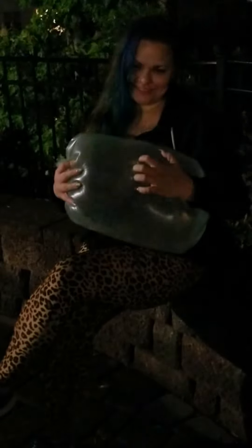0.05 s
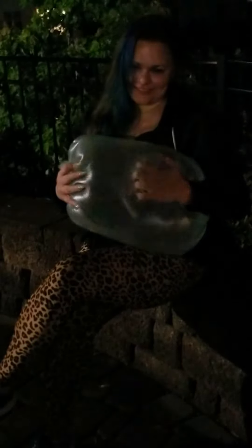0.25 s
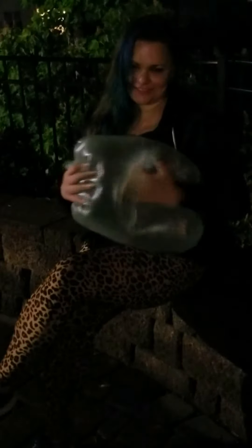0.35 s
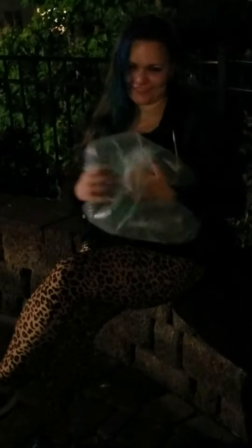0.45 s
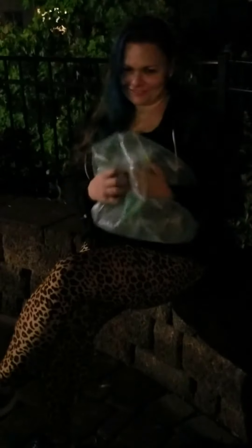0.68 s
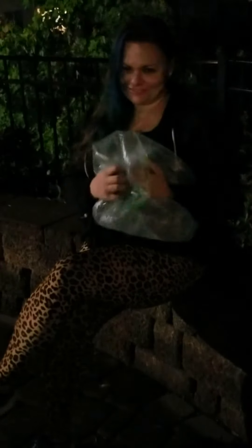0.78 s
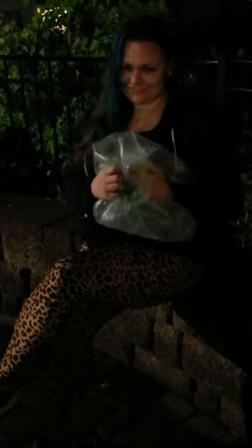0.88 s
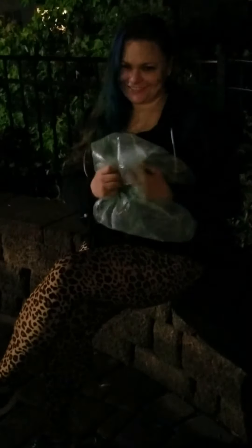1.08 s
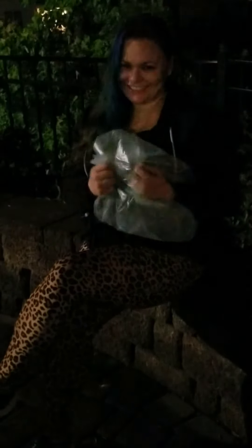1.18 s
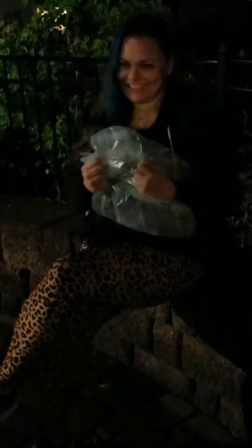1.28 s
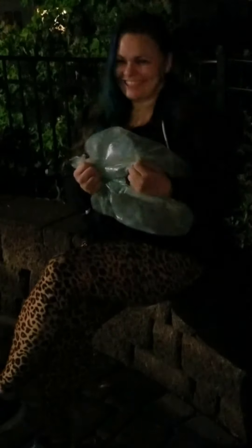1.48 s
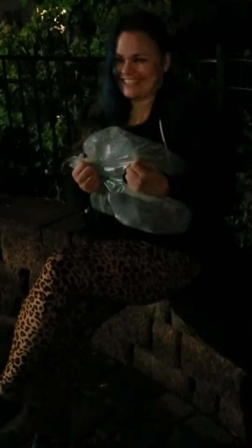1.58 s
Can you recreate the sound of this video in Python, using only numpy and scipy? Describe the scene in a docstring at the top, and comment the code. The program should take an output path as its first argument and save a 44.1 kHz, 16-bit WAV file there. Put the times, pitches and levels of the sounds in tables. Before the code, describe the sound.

An air-filled plastic bag bursts in three sharp, overloading pops, with escaping air and soft film rustle.

```python
"""Soft rubbing over a low night rumble, then three sharp pops that overload the input, the first followed by
two weaker thumps: an air-filled plastic bag is squeezed close to the microphone and bursts. Each burst is a
pressure pulse, ringing air and film modes, a noise crack and a short noise tail. Escaping air hisses (shaped
noise) and whistles (gliding tones). Film rustles (noise) and bumps (short sines) throughout, before and
after the pops; faint wavering far-off tones come and go.
"""
import sys
import numpy as np
from scipy import signal
from scipy.fft import rfft, irfft
from scipy.io import wavfile
from scipy.ndimage import uniform_filter1d

SR = 44100
rng = np.random.default_rng(int(sys.argv[2]) if len(sys.argv) > 2 else 0)


def to_wav(sig):
    """Store sig (one row per channel, or 1-D mono) as 16-bit WAV at the path in sys.argv[1].

    Samples outside -1..1 are clipped; the rate is SR.
    """
    pcm = np.clip(np.atleast_2d(sig), -1, 1) * 32767
    pcm = np.round(pcm).astype(np.int16)
    wavfile.write(sys.argv[1], SR, pcm.T)  # frames by channels


N = 72765
T, HZ = np.arange(N) / SR, np.fft.rfftfreq(N, 1 / SR)

# Spectra below are relative: colour() rescales the result to rms 1.

# Three pops, with two weaker thumps after the first: (time [s], blast [dB], air ring [dB],
#   ring pitch [Hz], film ring [dB], crack [dB], crack decay to 1/e [s], tail [dB], tail length [s])
POPS = [(0.2188, -36.5, -11, 268.5, 6.5, -1.5, 0.0035, -15.5, 0.018),
        (0.227, -20.5, -11.5, 290, -14.5, -21.5, .002, -24, 0.017),
        (0.2395, -12.5, -15, 390, -3.5, -19, 0.00067, -19, 0.013),
        (0.3306, -4, -4, 378, 2.5, -8.5, 0.0037, -17, 0.015),
        (.4234, 3, -9, 378.2, 2, -15, 0.0023, -16, 0.011)]
# Modes of the air in the bag: (multiple of ring pitch [ratio], relative level [dB], T60 [s])
AIR_MODES = [(1, 1.5, 0.029), (.68, -7, 0.02)]
# Modes of the stretched film: (frequency [Hz], relative level [dB], T60 [s])
FILM_MODES = [(686, -24, 0.057), (847.7, -22.5, 0.026), (1285, -12.5, 0.028), (1383, -11.5, 0.02),
              (1896, -10.5, 0.012), (2912, -21.5, .03), (3150, -23.5, 0.012), (4904, -24, .02)]
# Crack spectrum: (frequency [Hz], level [dB])
CRACK_SPECTRUM = [(100, -14), (500, 16), (950, -4), (1300, 5), (1750, -6), (2100, 0), (3200, -2.5),
                  (4300, -18), (6000, -9), (8000, -17.5), (11000, -15), (16000, -31)]
# Spectrum of the fading body of the noise tail: (frequency [Hz], level [dB])
TAIL_BODY_SPECTRUM = [(25, -20), (80, -18.5), (160, 6), (300, 0), (420, -1), (520, -5.5), (750, -4.5),
                      (1000, -10.5), (1350, -7), (2500, -12), (5000, -20.5), (10000, -30.5), (16000, -35)]
# Spectrum of the level treble of the noise tail: (frequency [Hz], level [dB])
TAIL_TREBLE_SPECTRUM = [(60, -29), (1500, -1), (2800, 4), (6000, -17), (11000, -6), (16000, -19.5)]
BLAST_ZERO_S = 0.00054  # the pulse turns from pressure to suction here
TEAR_S, TEAR_DB = 0.0016, -10  # rise before the pop
TAIL_FADE_DB, TAIL_END_S, TAIL_TREBLE_DB = 8, 0.0013, -17.5
CRACK_LIKENESS = 0.73

# Escaping air: (time [s], level [dB])
LEAK_LEVEL = [(.195, -81), (.213, -54), (.222, -27.5), (.26, -38.5), (.32, -42), (.35, -36.5),
              (.365, -37.5), (.41, -36.5), (.445, -37.5), (.484, -38.5), (.5, -51), (.56, -53), (.7, -68)]
# Hiss spectrum before dulling: (frequency [Hz], level [dB])
HISS_SPECTRUM = [(60, 5.5), (320, -5), (520, -10), (700, 0), (1000, -5), (2000, -4), (2600, -3.5),
                 (4000, -5), (7000, -9), (12000, -9.5), (16000, -16.5)]
DULL_FROM_S, DULL_DB_PER_S, DULL_HZ = 0.34, 103, 2540
CRINKLE_DB, CRINKLES_PER_S = -6.5, 1300

# Main whistle of the tear: (time [s], pitch [Hz], level before breath mix [dB])
WHISTLE = [(.222, 1340, -39.5), (.25, 1356, -33.5), (.275, 1346, -32), (.292, 1306, -35.5),
           (.3, 1228, -40.5), (.325, 1284, -38), (.348, 1255, -39)]
# Fuzzy upper whistle: (time [s], pitch [Hz], level before breath mix [dB])
UPPER_WHISTLE = [(.25, 2720, -46), (.278, 2880, -39), (.305, 2640, -47)]
# Airy falling band: (time [s], centre [Hz], level [dB])
AIRY_BAND = [(.355, 2150, -45), (.385, 2050, -40), (.415, 1800, -43.5), (.48, 1550, -59)]

# Low bumps: the first pop's thump at 0.23 s, otherwise soft handling bumps:
#   (time [s], peak [dB], pitch [Hz], half length to 1/e [s])
BUMPS = [(.015, -41, 128.6, 0.014), (0.23, -19, 90, 0.0064), (0.389, -46.5, 290, 0.0088),
         (0.481, -40.5, 328, 0.0089), (.594, -37, 102, 0.0037), (0.629, -41.5, 100, 0.0054),
         (.706, -38.5, 67, 0.012), (0.822, -36, 69.3, 0.0085), (1.229, -37, 110, 0.005),
         (1.287, -46, 115, 0.008), (1.321, -43, 137.5, 0.012), (1.502, -46, 86.6, .01),
         (1.513, -39.5, 301, 0.0079), (1.532, -49.5, 330, .016)]
# Hands on the film: (time [s], level before a mean 9 dB cut [dB])
RUB_LEVEL = [(0, -38.5), (.15, -46.5), (.55, -53), (.75, -43.5), (.92, -59), (1.1, -46.5), (1.22, -45),
             (1.34, -45), (1.45, -48.5), (1.56, -52), (1.65, -63.5)]
# Rubbing spectrum: (frequency [Hz], level [dB])
RUB_SPECTRUM = [(25, -8), (70, 2.5), (170, -4.5), (320, -11.5), (600, -25), (1200, -21), (3000, -32.5),
                (8000, -33.5), (16000, -40.5)]
# Film sliding over film: (time [s], level [dB])
RUSTLE_LEVEL = [(0, -57.5), (.19, -66.5), (.55, -64), (.85, -62), (1.05, -67), (1.2, -67), (1.35, -68.5),
                (1.55, -59), (1.65, -61)]
# Sliding spectrum: (frequency [Hz], level [dB])
RUSTLE_SPECTRUM = [(300, -20.5), (700, -12.5), (1150, 2), (1400, -4.5), (1750, -11), (2300, -8),
                   (2800, -4.5), (4000, -17), (16000, -36.5)]

# Tail from walls and bushes: (frequency [Hz], level [dB])
YARD_SPECTRUM = [(60, -12.5), (400, -2), (2000, -3), (6000, -1.5), (16000, -22)]
YARD_DB, YARD_T60_S, YARD_DELAY_S = -36, 0.45, 0.012

# Thin far-off tones, perhaps night animals: (start [s], length [s], mean pitch [Hz], mean peak [dB])
TONES = [(0.537, 0.17, 2700, -67.5), (0.542, .2, 2800, -60), (0.667, 0.091, 2630, -60),
         (0.741, 0.2, 2980, -68), (0.751, 0.16, 880, -67), (.91, 0.13, 2490, -66), (0.939, 0.14, 3110, -65),
         (1.16, .15, 892, -62.5), (1.166, 0.15, 3150, -65.5), (1.17, 0.14, 1137, -65),
         (1.388, 0.18, 2360, -63), (1.417, 0.17, 2670, -68), (1.524, 0.18, 2724, -71),
         (1.511, 0.17, 1204, -64), (1.56, .1, 897, -66.5)]
# Outdoor background spectrum: (frequency [Hz], level [dB])
NIGHT_SPECTRUM = [(25, -76.5), (70, -60.5), (140, -77.5), (300, -79), (600, -88), (850, -87.5), (1150, -91),
                  (1700, -88), (2300, -85), (3000, -89.5), (4000, -92.5), (8000, -96.5), (13000, -93.5),
                  (16000, -100)]
NIGHT_DB = -55

# Left-right likeness of wide noise: (frequency [Hz], correlation [-1 to 1])
LIKENESS = [(30, 0.19), (100, .75), (400, 0.4), (1000, 0.38), (2000, 0.34), (16000, 0.14)]
# Right port colour: (frequency [Hz], level over the left port [dB])
RIGHT_PORT = [(30, 0), (90, -1.3), (170, -.5), (350, 2.8), (700, -2), (1400, 2.8), (2800, 1.8), (5500, .3),
              (10000, -2.2), (16000, -1.6)]
# Lead of the left port: (frequency [Hz], phase [rad])
PORT_PHASE = [(30, 0), (400, 0.12), (1200, 0.98), (2200, 2.5), (3000, 4.5), (4500, 4), (7000, 6.5),
              (10000, 6), (16000, 6)]
LOW_CUT_HZ, BAND_EDGE_HZ, CEILING = 37, 15900, 0.96


def amp(db):
    """Decibels to gain."""
    return 10 ** (np.asarray(db) / 20)


def unit(x):
    """Scales to rms 1."""
    return x / np.sqrt(np.mean(x ** 2) + 1e-20)


def read(points):
    """Reads a table over log frequency."""
    f, value = np.transpose(points)
    return np.interp(np.log(HZ + 1), np.log(f), value)


def level(points):
    """Gain from a dB curve, silent outside it."""
    return amp(np.interp(T, *np.transpose(points), left=-200, right=-200))


def colour(x, points):
    """Gives a signal a spectrum, at rms 1."""
    return unit(irfft(rfft(x) * amp(read(points)), N))


def pair(likeness):
    """White noise at two ports with a given correlation, from mid and side parts."""
    a, b = rfft(rng.standard_normal((2, N)))
    c = np.clip(likeness, -1, 1)
    mid = a * np.sqrt((1 + c) / 2)
    side = b * np.sqrt((1 - c) / 2)
    return irfft(np.array([mid + side, mid - side]), N)


def drift(rate_hz):
    """Slow random motion: noise under a Gaussian low-pass, at rms 1."""
    return unit(irfft(rfft(rng.standard_normal(N)) * np.exp(-(HZ / rate_hz) ** 2), N))


def ring(t, hz, db, t60_s):
    """One dying mode, from zero."""
    return amp(db - 60 * t / t60_s) * np.sin(2 * np.pi * hz * t)


def air_ring(t, ring_hz):
    """Air in the bag rings in dying cosine modes."""
    return sum(amp(db - 60 * t / t60_s) * np.cos(2 * np.pi * ring_hz * multiple * t)
               for multiple, db, t60_s in AIR_MODES)


def noise_tail(t, tail_s):
    """A short noise tail after each pop: fading body, level treble, quick end."""
    body = amp(-TAIL_FADE_DB * t / tail_s) * colour(pair(read(LIKENESS)), TAIL_BODY_SPECTRUM)
    treble = amp(TAIL_TREBLE_DB) * colour(pair(0.15), TAIL_TREBLE_SPECTRUM)
    end = np.exp(-np.maximum(t - tail_s, 0) / TAIL_END_S)
    return end * (body + treble)


def pop(time_s, blast_db, air_db, ring_hz, film_db, crack_db, crack_s, tail_db, tail_s):
    """The film starts to tear, lets go a pressure pulse and a crack, rings, and leaves a noise tail."""
    t, after = np.maximum(T - time_s, 0), T >= time_s
    u = t / BLAST_ZERO_S
    blast = amp(blast_db) * after * (1 - u) * np.exp(-u)
    air = amp(air_db) * after * air_ring(t, ring_hz)
    pulse = uniform_filter1d(blast + air, size=5)  # softens the onset edge
    film = amp(film_db) * sum(ring(t, *mode) for mode in FILM_MODES)
    tearing = amp(TEAR_DB) * np.exp(-abs(T - time_s) / TEAR_S)
    crack_gain = amp(crack_db) * np.where(after, np.exp(-(t / crack_s) ** 2), tearing)
    crack = crack_gain * colour(pair(CRACK_LIKENESS), CRACK_SPECTRUM)
    return pulse + film + crack + amp(tail_db) * after * noise_tail(t, tail_s)


def leak(rough_db=1.0):
    """Turbulent air leaves the tear with crinkles, and loses treble as the pressure falls."""
    crinkles = unit((rng.random(N) < CRINKLES_PER_S / SR) * rng.standard_normal(N))
    jet = colour(pair(0.43) + amp(CRINKLE_DB) * crinkles, HISS_SPECTRUM)
    body = irfft(rfft(jet) / (1 + (HZ / DULL_HZ) ** 4), N)
    treble_gain = amp(-DULL_DB_PER_S * np.clip(T - DULL_FROM_S, 0, 0.1))  # falls for 0.1 s, then holds
    hiss = body + treble_gain * (jet - body)
    return hiss * level(LEAK_LEVEL) * amp(rough_db * drift(130))


def sing(curve, fuzz, width_hz):
    """A tone along a pitch and level curve, from clean (fuzz 0) to breathy (1)."""
    time_s, hz, db = np.transpose(curve)
    carrier = np.exp(2j * np.pi * np.cumsum(np.interp(T, time_s, hz)) / SR)
    breath = drift(width_hz) + 1j * drift(width_hz)
    envelope = np.sqrt(2) * (1 - fuzz) + fuzz * breath
    return (carrier * envelope).real * level(np.c_[time_s, db])


def whistle():
    """The jet sings at the lips of the tear: a clean note, a fuzzy upper one, then an airy band."""
    return sing(WHISTLE, 0.06, 150) + sing(UPPER_WHISTLE, 0.45, 160) + sing(AIRY_BAND, 1, 240)


def low_bumps():
    """Short sine bursts: the first pop's thump at 0.23 s, otherwise soft handling bumps."""
    return sum(amp(db) * np.exp(-((T - s) / half_s) ** 2) * np.sin(2 * np.pi * hz * (s - T))
               for s, db, hz, half_s in BUMPS)


def rubbing(rough_db=3):
    """Fingers rub the film: uneven noise."""
    unevenness = amp(rough_db * (drift(27) - 3))
    return colour(pair(read(LIKENESS)), RUB_SPECTRUM) * level(RUB_LEVEL) * unevenness


def rustle(patchy_db=1.5):
    """Film slides softly over film: patchy noise."""
    return colour(pair(0.32), RUSTLE_SPECTRUM) * level(RUSTLE_LEVEL) * amp(patchy_db * drift(25))


def yard(x):
    """A weak tail from walls and bushes: convolution with decaying noise."""
    decay = amp(-60 * T / YARD_T60_S) * (T > YARD_DELAY_S)
    tail = colour(pair(0.067), YARD_SPECTRUM) * decay
    return amp(YARD_DB) * signal.fftconvolve(x, tail / np.linalg.norm(tail[0]), axes=1)[:, :N]


def night():
    """Low outdoor rumble and hiss, with faint wavering tones from far away."""
    out = amp(NIGHT_DB) * colour(pair(read(LIKENESS)), NIGHT_SPECTRUM)
    for start_s, length_s, hz, db in TONES:
        arch = np.sqrt(np.abs(np.sin(np.pi * np.clip((T - start_s) / length_s, 0, 1))))
        phase = 2 * np.pi * np.cumsum(hz * (1 + 0.008 * drift(45))) / SR
        port_offset = rng.uniform(0, 2.3, (2, 1))  # rad
        out = out + arch * amp(db + drift(27)) * np.sin(phase + port_offset)
    return out


def scene():
    """Sound reaches the left port a moment before the right one, which has its own colour."""
    low_cut = signal.butter(2, LOW_CUT_HZ, "high", fs=SR)  # a small bag radiates little deep bass
    pops = signal.lfilter(*low_cut, sum(pop(*row) for row in POPS))
    bag = pops + leak() + whistle() + low_bumps() + rubbing() + rustle()
    left, right = bag + yard(bag) + night()
    port = amp(read(RIGHT_PORT)) * np.exp(-1j * read(PORT_PHASE))
    return np.array([left, irfft(rfft(right) * port, N)])


def record(dry):
    """The input overloads on the pops (smooth saturation); then the band limit."""
    clipped = dry / (1 + (dry / CEILING) ** 8) ** (1 / 8)
    band_limit = signal.firwin(255, BAND_EDGE_HZ, window=("kaiser", 8), fs=SR)
    return signal.oaconvolve(clipped, band_limit[None], "same")


dry = scene()
out = record(dry)
to_wav(out)
```